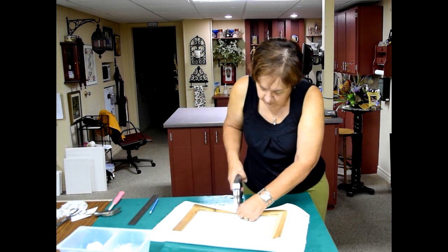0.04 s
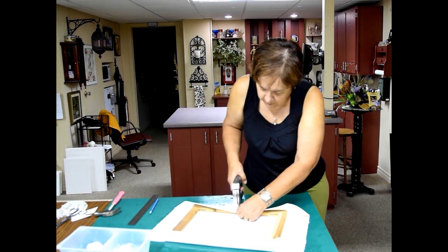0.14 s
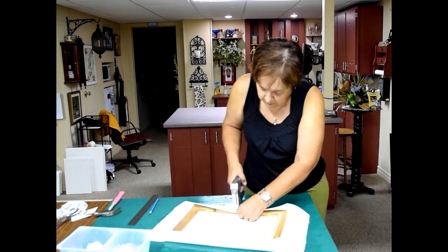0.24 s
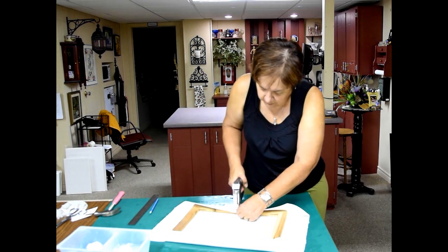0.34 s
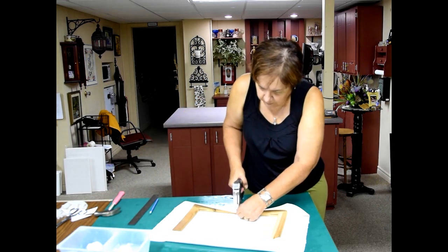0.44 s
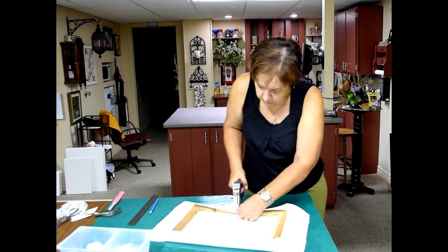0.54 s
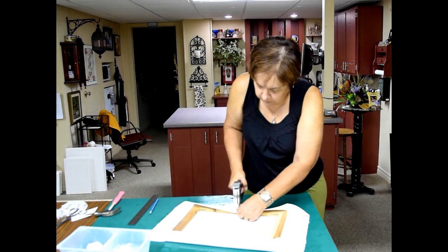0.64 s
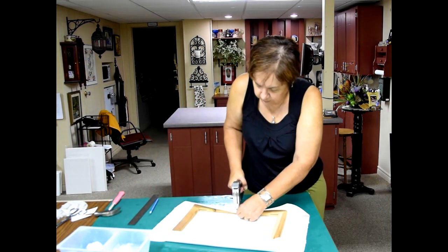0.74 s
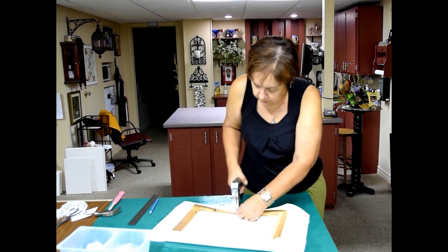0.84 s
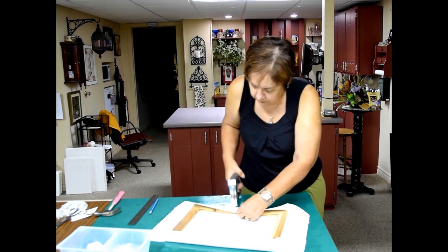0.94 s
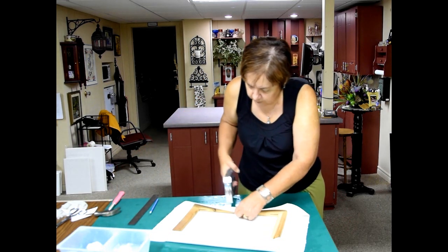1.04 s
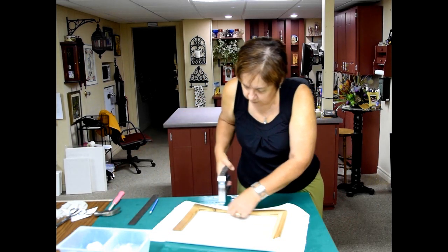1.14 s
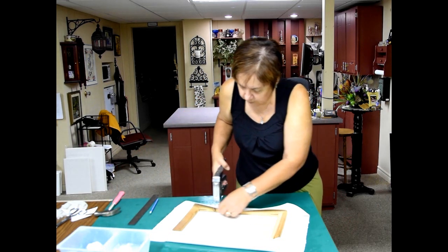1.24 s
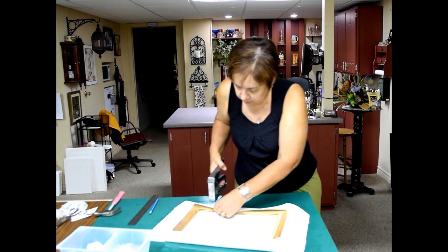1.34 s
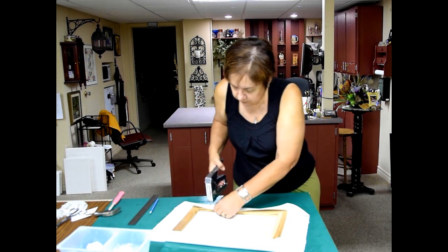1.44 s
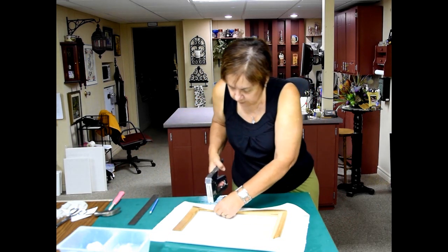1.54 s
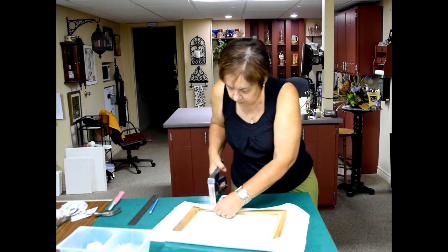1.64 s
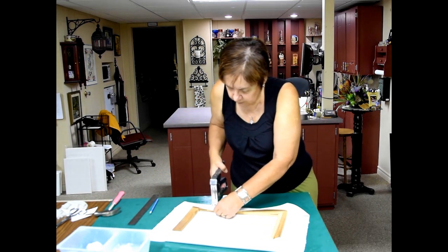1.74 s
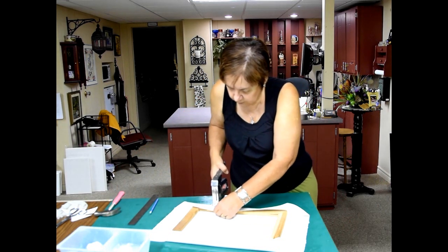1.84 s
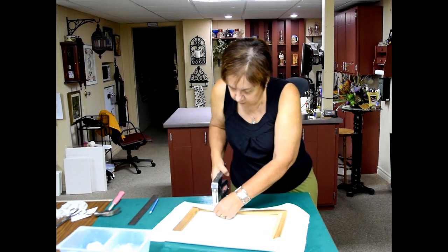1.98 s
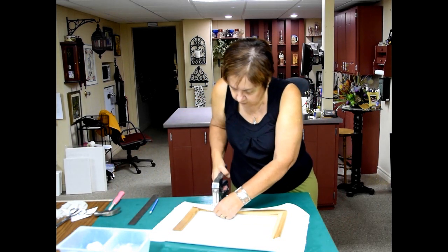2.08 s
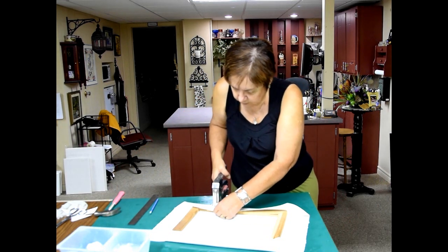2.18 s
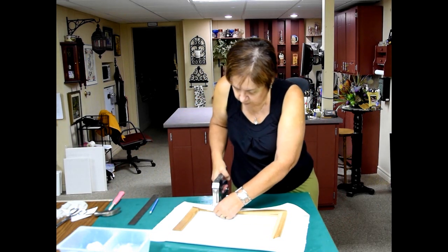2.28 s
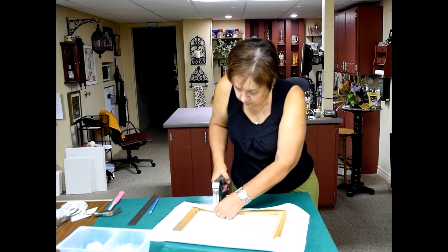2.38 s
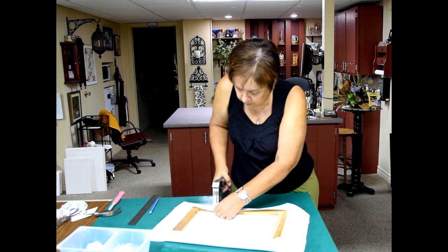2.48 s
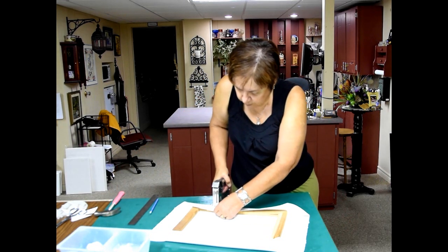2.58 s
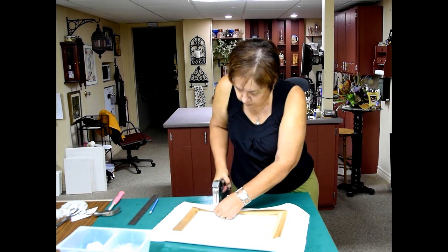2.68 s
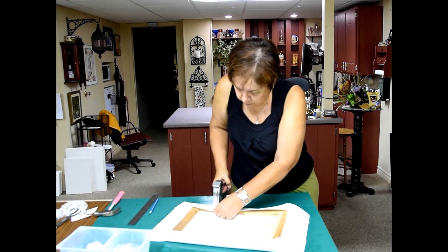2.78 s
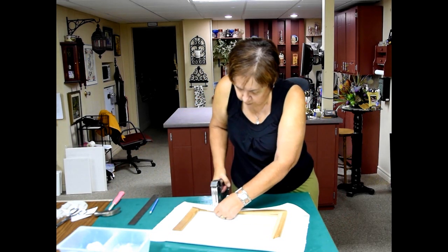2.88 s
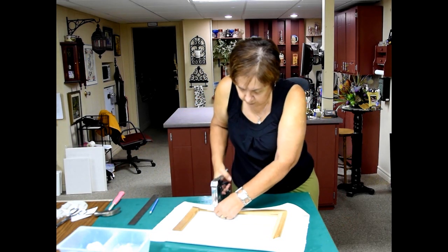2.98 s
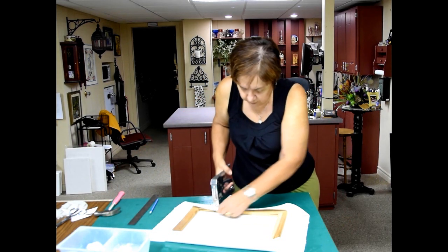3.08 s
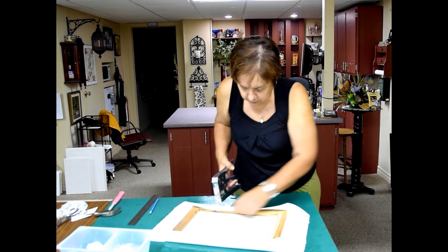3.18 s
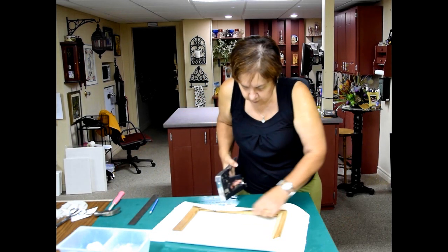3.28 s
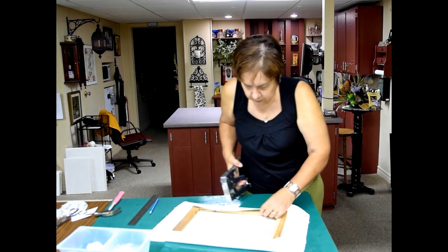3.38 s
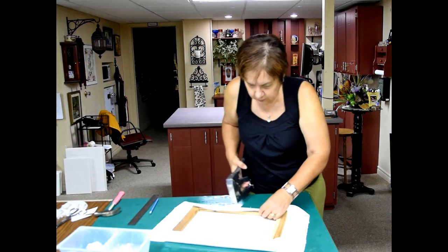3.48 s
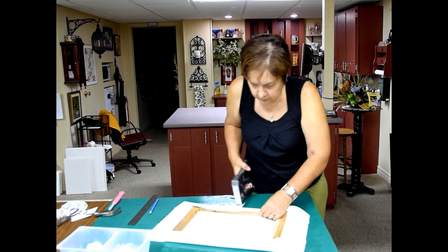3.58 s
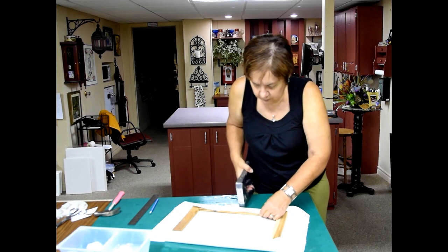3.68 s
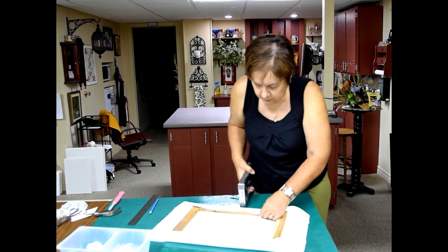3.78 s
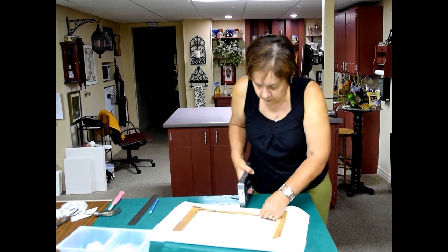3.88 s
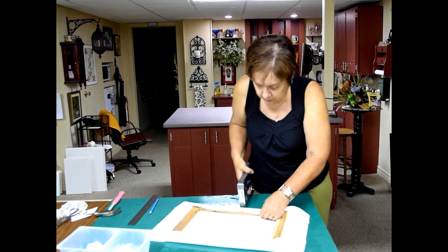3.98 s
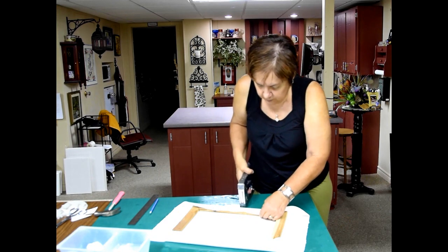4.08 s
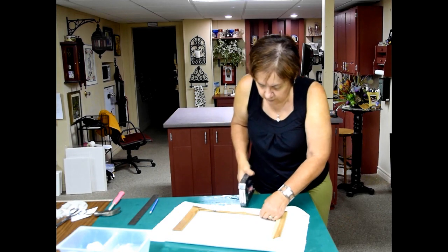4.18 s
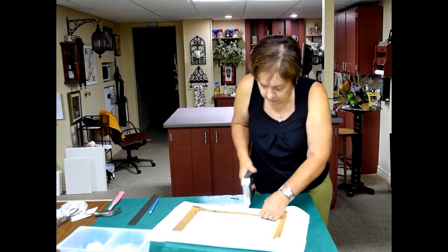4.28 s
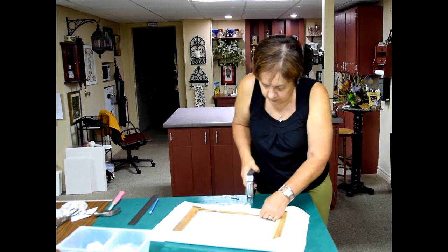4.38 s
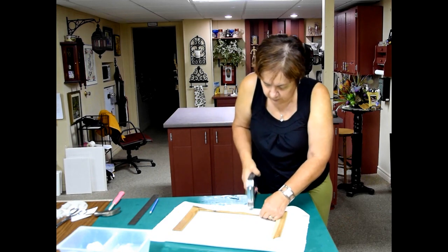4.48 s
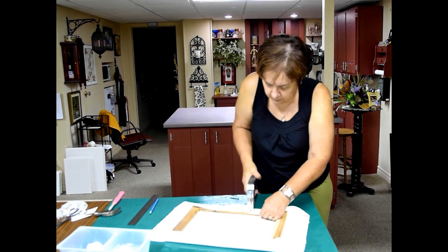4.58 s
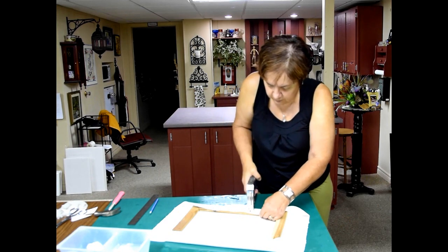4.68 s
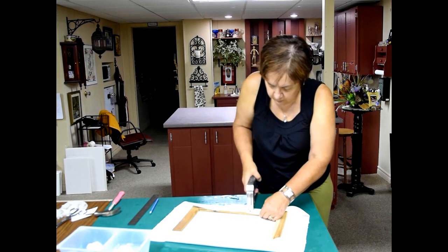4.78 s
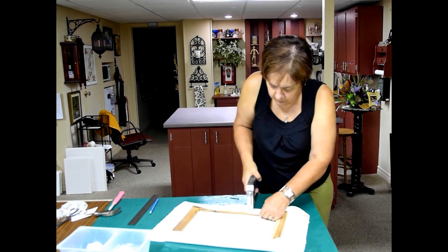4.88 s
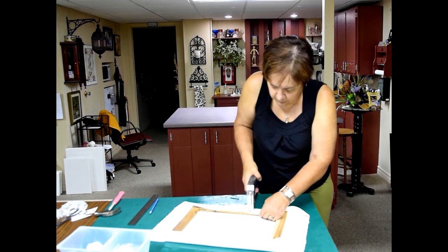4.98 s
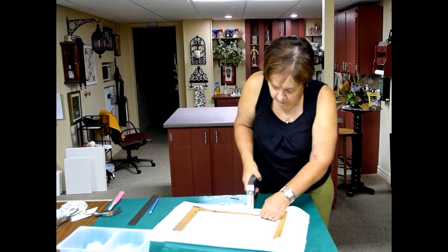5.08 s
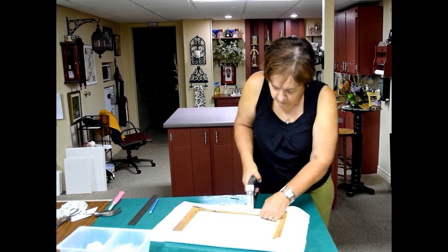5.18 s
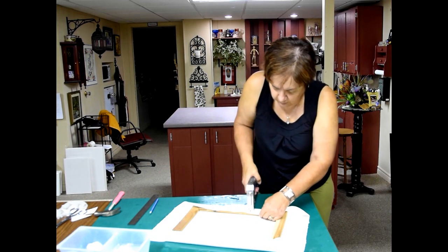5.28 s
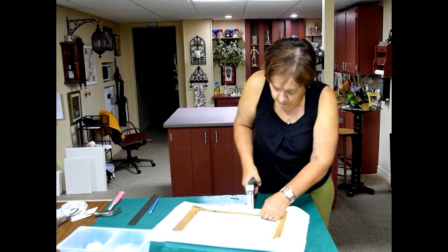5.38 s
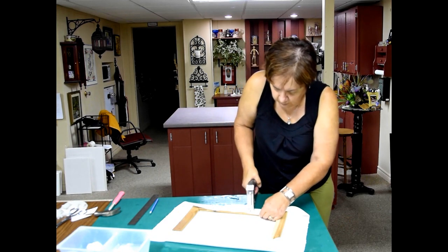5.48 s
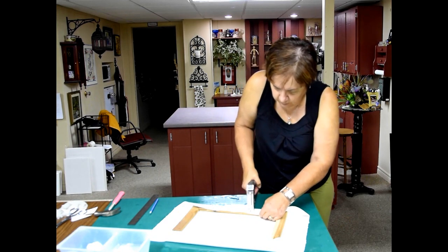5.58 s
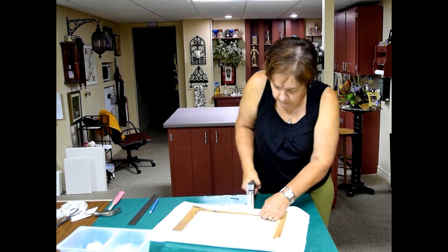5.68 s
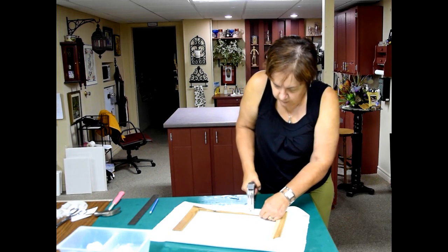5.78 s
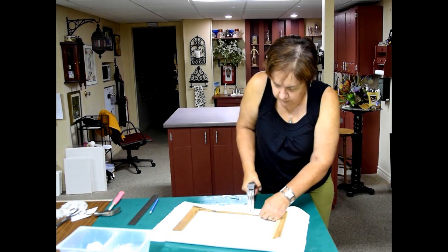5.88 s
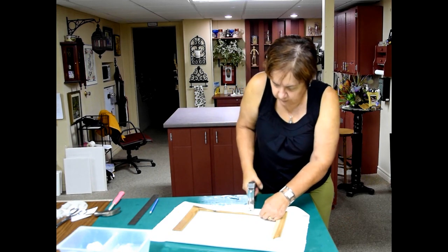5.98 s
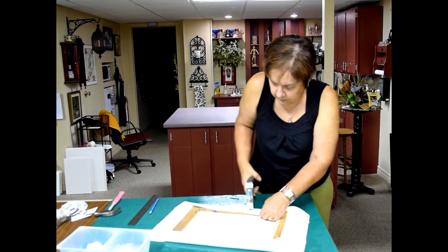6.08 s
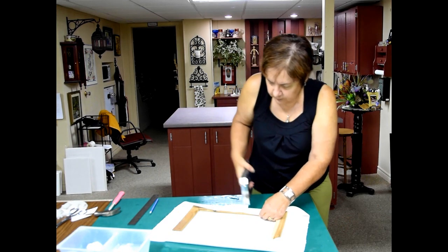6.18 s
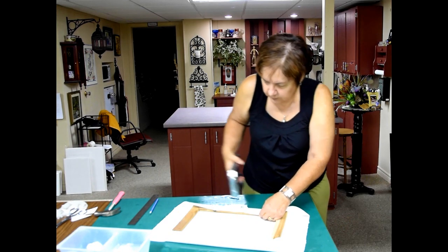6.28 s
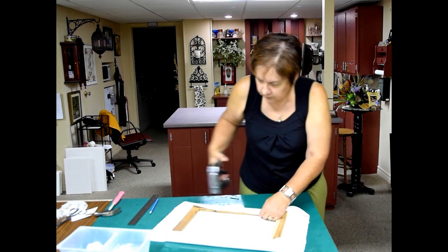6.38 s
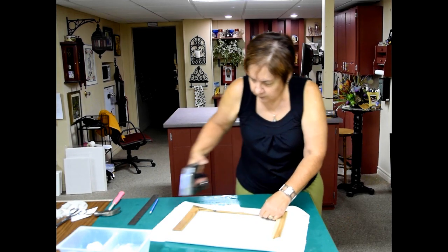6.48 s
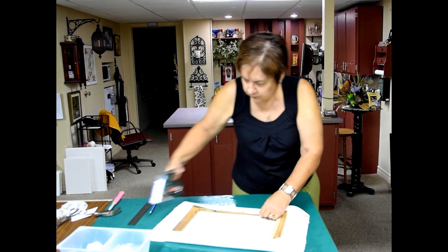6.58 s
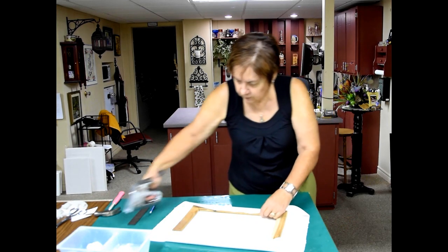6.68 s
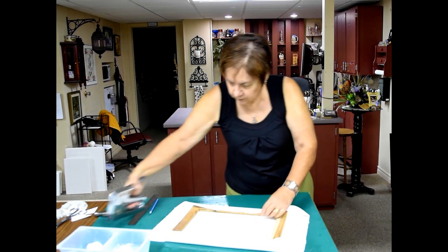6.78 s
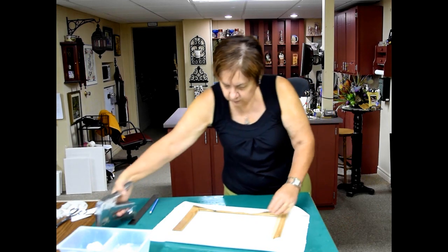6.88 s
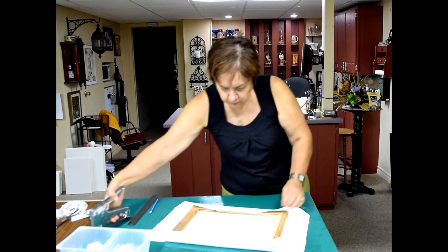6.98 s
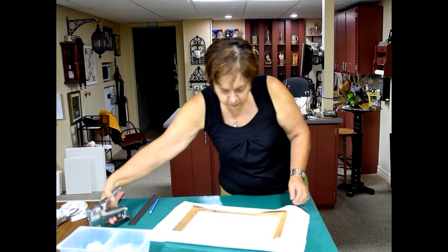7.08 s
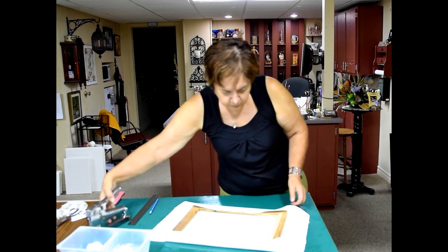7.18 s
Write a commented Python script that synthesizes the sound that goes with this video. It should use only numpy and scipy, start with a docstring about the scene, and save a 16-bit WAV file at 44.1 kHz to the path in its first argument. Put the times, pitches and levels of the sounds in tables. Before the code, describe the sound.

A hand staple gun works on a canvas-covered wooden frame in a quiet workshop with a short echo, heard from across the table. After faint ticks, the lever clicks and the first staple fires at 0.7 seconds with a sharp, slightly overloaded bang. The lever springs back with a ringing metallic clack at 1.2. A second click and bang come at about 2.8, with the clack at 3.3. The gun knocks dully on the frame around 3.0, 3.8 and 4.7, among small metal ticks and very faint canvas brushes. The third click and bang arrive at about 5.8, followed by a knock at 6.1 and the lever's clack at 6.3. The soft room air dips briefly after each shot. At about 7.1 seconds the gun is put down on the table with a quick, firm double knock and a clink.

```python
"""In the soft air of a low workshop, canvas rustles and a hand staple gun ticks as it is moved.
The lever clicks under the squeeze, the spring fires a staple through canvas into a wooden frame
with a bang that overloads the microphone, and the lever clacks back while the room air dips.
This comes twice more; in between, the gun is set on the frame and the canvas rustles.
At the end the gun is put down on the work table with a double knock."""
import sys
import numpy as np
from scipy import signal
from scipy.fft import rfft, irfft
from scipy.io import wavfile
from scipy.ndimage import uniform_filter1d

SR = 44100
rng = np.random.default_rng(int(sys.argv[2]) if len(sys.argv) > 2 else 0)


def file_out(sig):
    """Save sig as 16-bit WAV at sys.argv[1]."""
    # one column per channel
    cols = np.atleast_2d(sig).T
    # limit, then scale
    lim = np.clip(cols, -1, 1)
    pcm = np.round(lim * 32767).astype(np.int16)
    wavfile.write(sys.argv[1], SR, pcm)


N = 319416

# tone of the room air, the sliding canvas and each kind of contact: f/Hz, level/dB
AIR_EQ = [(30, -40.5), (120, -28), (200, -17.5), (320, -7.5), (600, -0.5), (1000, 2), (1800, -4),
          (2500, -9.5), (3600, -23), (4600, -35.5), (6000, -38.5), (15000, -46)]
CANVAS_EQ = [(200, -23), (1500, 1), (3000, 1), (4000, 2), (5000, -14), (7000, -42), (15000, -40)]
TICK_EQ = [(50, -35), (150, -27), (280, -11), (850, -3), (1300, 2.5), (2200, 3.5), (3000, -3), (4200, -9),
           (5500, -20), (9000, -23), (15000, -51)]
KNOCK_EQ = [(30, -19), (140, -9), (210, -7), (310, 1.5), (420, -5.5), (600, -3.5), (900, -3.5),
            (2200, -6.5), (3500, -17.5), (6000, -31), (10000, -65), (15500, -79)]
RETURN_EQ = [(150, -71), (400, -33), (600, -19), (820, -17.5), (1350, 4), (2000, -1.5), (2600, -3),
             (4800, -6), (6000, -11.5), (9500, -21), (13000, -38), (15500, -62)]
CATCH_EQ = [(40, -40.5), (150, -29), (270, -10.5), (850, -9.5), (1250, -3.5), (2200, 0.5), (4000, -3),
            (6000, -10), (9500, -12.5), (13000, -22.5), (15500, -35)]
SHOT_EQ = [(40, -44.5), (150, -27.5), (260, -6.5), (500, -4.5), (780, -8.5), (1300, -1), (2400, -3),
           (3200, -6), (4200, -6.5), (5700, -13.5), (8000, -12), (11000, -16), (15500, -27)]
# the workshop's reverb: f/Hz, t60/s
REVERB_T60 = [(60, 0.067), (300, 0.41), (700, 0.29), (2000, 0.29), (4500, 0.29), (9000, 0.31),
              (15000, 0.15)]
# early reflections off table top, ceiling and wall: delay/s, level/dB
REFLECTIONS = [(.00315, -19), (.00965, -18), (0.0143, -18.5)]
# resonances of the steel gun on the frame: f/Hz, width/Hz, boost/dB, free ring/dB
STEEL_MODES = [(270, 60, 4, -42), (478.4, 81, 2, -31.5), (581, 54, 3.5, -32.5), (1277, 46, 2.5, -27.5),
               (1350, 50, 1.5, -28), (1460, 70, 0.5, -26), (1723, 45, -1, -30), (1746, 52, 1.5, -33),
               (2026, 62, 5, -24.5), (2275, 40, 0, -28), (2337.5, 180, 4, -21), (2580, 80, -0.5, -26.5),
               (2866, 77, 3.5, -26), (3610, 90, 2.5, -26), (4070, 83, 0.5, -24.5), (4160, 130, -1, -27.5),
               (4720, 110, 0.5, -26.5), (5060, 37, 1.5, -21), (6760, 60, 1.5, -27.5), (6970, 16, 1, -21.5),
               (8987, 34, 0, -26), (9400, 120, 6, -29)]
# the lever's ring: f/Hz, level/dB, t60/s
LEVER_PARTIALS = [(1850, -11, 0.23), (1932, -18, 0.34), (4000, -5, 0.091), (4750, -13.5, 0.12),
                  (9700, -24, 0.12)]
# the hand brushes the canvas: t/s, level/dB, swell width/s
CANVAS_BRUSHES = [(0.062, -64, 0.011), (2.072, -67, 0.023), (4.06, -67, 0.014), (4.561, -68.5, .02),
                  (5.08, -65.5, 0.02), (5.476, -68.5, 0.08), (6.922, -74, .13)]
# loose parts tick as the gun moves or the lever takes up slack: t/s, level/dB, tilt/(dB/oct), ring/Hz
PART_TICKS = [(0.148, -56.5, 3.5, 2140), (0.186, -50.5, -4, 2060), (0.51, -38, -2, 1970),
              (1.059, -47, 1.5, 3020), (2.152, -49.5, 5, 2000), (2.34, -50, 1, 2090), (2.4, -49, -1, 1180),
              (2.551, -50, -4.5, 2030), (2.65, -40, -2, 1406), (3.12, -41.5, 1, 2620),
              (3.3993, -42, 10, 11010), (3.464, -49, 2, 1480), (4.267, -40.5, 4.5, 1160),
              (5.323, -39, -0.5, 2280), (5.567, -47, -4, 2052), (5.6755, -32, -2.5, 1990),
              (6.180, -38.5, 3.5, 1910)]
# the gun knocks on frame or table and its loose parts clink:
# t/s, level/dB, tilt/(dB/oct), wood ring/Hz, clink offset/s, clink/dB, clink ring/Hz, ring boost/dB
GUN_KNOCKS = [(2.11, -57, -3.5, 201, -0.005, -73, 2000, 5),
              (3.025, -28.5, 3.4, 600, 0.0036, -26.5, 2330, 9.5),
              (3.849, -22.5, -1.5, 238.8, -0.0061, -58, 1600, 6),
              (4.676, -34, -2, 200, -0.012, -51.5, 1300, 23), (6.0869, -25, -1.2, 453, 0, -32.5, 2500, -2),
              (7.088, -14.5, -1.5, 710, 0.00028, -25.5, 1140, 22),
              (7.112, -11, -2.3, 627, 0.0039, -23, 1080, 27)]
# the lever springs back: t/s, level/dB, tilt/(dB/oct), ring/Hz, ring boost/dB, spring note/Hz
LEVER_RETURNS = [(1.240, -22, 2, 1400, 4.5, 1486), (3.2968, -19.5, 0, 1845, 13.5, 1630),
                 (6.2953, -21, 0, 1930, 13, 1504)]
# each return touches, hits the stop and bounces: delay/s, level/dB, extra tilt/(dB/oct), slide-in/s
RETURN_HITS = [(0, 0, -0.5, 0.019), (.0055, -3.5, 3.5, 0.014), (.029, -18.5, 8.5, .01)]
# the lever catches under the squeeze:
# t/s, level/dB, tilt/(dB/oct), rebound delay/s, rebound/dB, spring note/Hz, note/dB
LEVER_CATCHES = [(0.5658, -31, 3, .0056, -32, 2300, -22.5), (2.687, -25, 0.5, 0.022, -26.5, 3120, -42),
                 (5.714, -20, 1.5, .0204, -27, 3060, -37)]
# the spring fires: t/s, level/dB, tilt/(dB/oct), ring/Hz, ring boost/dB, air dip afterwards/dB
STAPLE_SHOTS = [(0.724, -0.5, 0.84, 1744, 2.5, -5), (2.8052, -0.5, 0, 286.3, 4.5, -10.5),
                (5.8641, -0.5, 1.5, 2430, 6, -18.5)]

TIME = np.arange(N) / SR
HIT_SIZE, PRE_ROLL = 24576, 1024   # samples in one hit, and how many precede its contact
AGE = (np.arange(HIT_SIZE) - PRE_ROLL) / SR   # seconds since the contact
HIT_HZ = np.maximum(np.arange(HIT_SIZE // 2 + 1) * SR / HIT_SIZE, 1)
OCTAVE_HZ = np.geomspace(60, 15360, 9)
OCTAVE_BANDS = np.array([np.interp(np.log(HIT_HZ), np.log(OCTAVE_HZ), row) for row in np.eye(9)])
MODE_WAVES = np.sin(2 * np.pi * np.outer(np.array(STEEL_MODES)[:, 0], AGE))


def from_db(db):
    """Decibels to gain."""
    return 10 ** (np.asarray(db) / 20)


def rms_one(x):
    """Scale to an rms of 1."""
    return x / np.sqrt(np.mean(np.abs(x) ** 2) + 1e-20)


def at_hz(points, hz):
    """Read a curve on a log-frequency axis."""
    point_hz, values = np.array(points).T
    return np.interp(np.log(hz), np.log(point_hz), values)


def decay(t60):
    """Silent before the contact, then dying away."""
    return (AGE >= 0) * np.exp(-np.log(1000) * np.abs(AGE) / t60)


def bell(hz, width_hz):
    """EQ bell of height 1."""
    return 1 / (1 + (2 * (HIT_HZ - hz) / width_hz) ** 2)


def minimum_phase(eq_db):
    """Filter of unit power whose resonances ring after the hit, never before."""
    cepstrum = irfft(np.log(from_db(eq_db)))
    cepstrum[1:HIT_SIZE // 2] *= 2
    cepstrum[HIT_SIZE // 2 + 1:] = 0
    return rms_one(np.exp(rfft(cepstrum)))


def noise(eq):
    """Steady noise shaped by an EQ curve, rms 1."""
    hz = np.maximum(np.arange(N // 2 + 1) * SR / N, 1)
    return rms_one(irfft(rfft(rng.standard_normal(N)) * from_db(at_hz(eq, hz)), N))


def add(out, sound, t):
    """Mix in a hit so that its contact lands at time t."""
    start = max(round(t * SR) - PRE_ROLL, 0)
    out[start:start + HIT_SIZE] += sound[:max(N - start, 0)]


def dip(t, recovery_s, wait_s=0.22, sink_s=0.45, held_until_s=0.78):
    """From 0 to 1 and back after a shot at t: sink, hold, recover."""
    sinking = np.clip((TIME - t - wait_s) / sink_s, 0, 1)
    return sinking * np.exp(-np.maximum(TIME - t - held_until_s, 0) / recovery_s)


def room_air(bed_db=-61.5, mids_hz=(650, 1700)):
    """A soft bed that dips after each shot; its bass and treble sink further and return more slowly."""
    level_db = bed_db + sum(depth_db * dip(t, recovery_s=0.025) for t, *_, depth_db in STAPLE_SHOTS)
    edges_db = 3.5 - 16 * sum(dip(t, recovery_s=0.21) for t, *_ in STAPLE_SHOTS)
    rush = noise(AIR_EQ)
    mids = signal.sosfiltfilt(signal.butter(2, mids_hz, "band", fs=SR, output="sos"), rush)
    return from_db(level_db) * (mids + from_db(edges_db) * (rush - mids))


def room_tail(sustain):
    """Dense reflections; each octave dies at its own rate, and sustain scales the decay times."""
    bands = irfft(rfft(rng.standard_normal(HIT_SIZE)) * OCTAVE_BANDS)
    return sum(band * decay(sustain * t60) for band, t60 in zip(bands, at_hz(REVERB_T60, OCTAVE_HZ)))


def early_reflections():
    """Near surfaces repeat each hit a few milliseconds later and comb its spectrum."""
    echoes = sum(from_db(db) * np.exp(-2j * np.pi * HIT_HZ * delay) for delay, db in REFLECTIONS)
    return rms_one(1 + echoes)


def canvas(grain_db=4):
    """Short, grainy swells of cloth sliding on wood."""
    swell = sum(from_db(db) * np.exp(-0.5 * ((TIME - t) / width) ** 2) for t, db, width in CANVAS_BRUSHES)
    flutter = rms_one(uniform_filter1d(rng.standard_normal(N), size=200))
    grain = rms_one(from_db(grain_db * flutter))
    return swell * grain * noise(CANVAS_EQ)


def steel_ring(t60=0.12, spread_db=2):
    """The steel rings on; each hit strikes every mode with a strength of its own."""
    ring_db = np.array(STEEL_MODES)[:, 3]
    strength = from_db(ring_db + spread_db * rng.standard_normal(len(ring_db)))
    polarity = rng.choice([-1, 1], len(ring_db))
    return decay(t60) * ((strength * polarity) @ MODE_WAVES)


def hit(eq, tilt_db, ring_hz, boost_db, crack, rattle, sustain, steel_db, slide_s=0, ring_width=0.11):
    """A crack and a rattle, each (level/dB, t60/s), plus steel ring and room, coloured by the gun."""
    envelope = sum(from_db(db) * decay(t60) for db, t60 in (crack, rattle))
    if slide_s:   # metal rubs on metal, ever harder, until it meets the stop
        envelope += (AGE < 0) * np.exp(-np.log(1000) * np.abs(AGE) / slide_s)
    burst = envelope * rng.standard_normal(HIT_SIZE)
    contact = burst + from_db(steel_db) * steel_ring() + room_tail(sustain)
    eq_db = at_hz(eq, HIT_HZ) + sum(db * bell(hz, width) for hz, width, db, _ in STEEL_MODES)
    # where and how hard the parts meet sets the brightness and favours one ring
    eq_db += tilt_db * np.log2(np.maximum(HIT_HZ, 200))
    eq_db += boost_db * bell(ring_hz, ring_width * ring_hz)
    return irfft(rfft(contact) * minimum_phase(eq_db) * early_reflections())


def tick(tilt_db, ring_hz, boost_db):
    """One light touch of loose metal parts."""
    return hit(TICK_EQ, tilt_db, ring_hz, boost_db, crack=(4, 0.0092), rattle=(2, 0.051),
               sustain=0.76, steel_db=-7.5, slide_s=0.009, ring_width=0.25)


def handling():
    """Dull knocks of the gun on wood, cushioned by the canvas, and small ticks of its loose parts."""
    out = np.zeros(N)
    for t, db, tilt_db, wood_hz, clink_s, clink_db, clink_hz, boost_db in GUN_KNOCKS:
        thud = hit(KNOCK_EQ, tilt_db, wood_hz, boost_db=10, crack=(4, 0.004), rattle=(-0.5, 0.09),
                   sustain=0.71, steel_db=-9, ring_width=0.36)
        clink = tick(tilt_db=6.5, ring_hz=clink_hz, boost_db=boost_db)
        add(out, from_db(db) * thud, t)
        add(out, from_db(clink_db) * clink, t + clink_s)
    for t, db, tilt_db, ring_hz in PART_TICKS:
        add(out, from_db(db) * tick(tilt_db, ring_hz, boost_db=7.5), t)
    return out


def ping(hz, t60, attack_s=0.0023):
    """One clean note of lever or spring that builds up and rings out."""
    return (decay(t60) - decay(attack_s)) * np.sin(2 * np.pi * hz * AGE)


def lever_releases():
    """Let go, the lever slides back and clacks against its stop; lever and spring ring on."""
    out = np.zeros(N)
    for t, db, tilt_db, ring_hz, boost_db, note_hz in LEVER_RETURNS:
        for delay, contact_db, extra_tilt_db, slide_s in RETURN_HITS:
            clack = hit(RETURN_EQ, tilt_db + extra_tilt_db, ring_hz, boost_db, crack=(1.5, 0.017),
                        rattle=(0, 0.037), sustain=0.77, steel_db=-6, slide_s=slide_s, ring_width=0.33)
            add(out, from_db(db + contact_db) * clack, t + delay)
        lever = sum(from_db(partial_db) * ping(hz, t60) for hz, partial_db, t60 in LEVER_PARTIALS)
        spring = from_db(-1.5) * ping(note_hz, t60=0.23, attack_s=0.043)
        add(out, from_db(db) * (lever + spring), t)
    return out


def catch(tilt_db, ring_hz, boost_db):
    """One sharp click of the lever against the loaded spring."""
    return hit(CATCH_EQ, tilt_db, ring_hz, boost_db, crack=(9, 0.017), rattle=(-0.5, 0.05),
               sustain=0.86, steel_db=3, slide_s=0.011)


def lever_squeezes():
    """The lever catches, then rebounds with a duller click that sets the spring singing."""
    out = np.zeros(N)
    for t, db, tilt_db, rebound_s, rebound_db, note_hz, note_db in LEVER_CATCHES:
        add(out, from_db(db) * catch(tilt_db, ring_hz=note_hz, boost_db=3), t)
        rebound = from_db(rebound_db) * catch(tilt_db=-1, ring_hz=1250, boost_db=5.5)
        spring = from_db(note_db) * ping(note_hz, t60=0.16)
        add(out, rebound + spring, t + rebound_s)
    return out


def shots(recoil_s=0.032, recoil_db=-10.5):
    """The driver slams the staple home; gun and frame ring, and the gun lands again from its recoil."""
    out = np.zeros(N)
    for t, db, *tone, _ in STAPLE_SHOTS:
        bang = hit(SHOT_EQ, *tone, crack=(7, 0.026), rattle=(1.5, 0.059),
                   sustain=1.095, steel_db=-4, ring_width=0.2)
        landing = hit(SHOT_EQ, *tone, crack=(5, 0.03), rattle=(0, 0.055),
                      sustain=0.8, steel_db=-1.5, ring_width=0.24)
        add(out, from_db(db) * bang, t)
        add(out, from_db(db + recoil_db) * landing, t + recoil_s)
    return out


def scene():
    """Everything reaches one microphone across the table."""
    return (shots() + lever_squeezes() + lever_releases() + handling() + canvas() + room_air())[None]


def hiss_gate(sound, threshold_db=-69, floor_db=-13, split_hz=5200):
    """The treble is turned down whenever it falls near or below the threshold."""
    body = signal.sosfiltfilt(signal.butter(6, split_hz, fs=SR, output="sos"), sound)
    treble = sound - body
    power = np.abs(uniform_filter1d(treble ** 2, size=512))
    gain = power / (power + from_db(threshold_db) ** 2)
    return body + treble * np.maximum(gain, from_db(floor_db))


def record(dry, ceiling=0.77, low_cut_hz=22, high_cut_hz=16000):
    """The bangs overload the input and soft-clip; then come low cut, hiss gate and high cut."""
    clipped = dry / (1 + (dry / ceiling) ** 6) ** (1 / 6)
    low_cut = signal.butter(1, low_cut_hz, "high", fs=SR, output="sos")
    gated = hiss_gate(signal.sosfilt(low_cut, clipped))
    high_cut = signal.firwin(161, high_cut_hz, fs=SR, window="blackman")
    return signal.fftconvolve(gated, high_cut[None], "same")


dry = scene()
out = record(dry)
file_out(out)
```